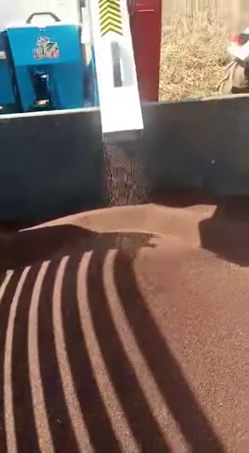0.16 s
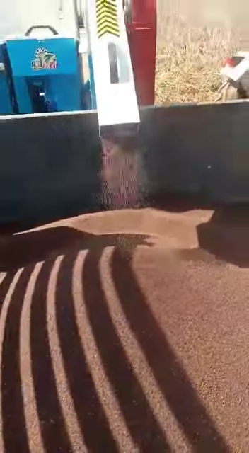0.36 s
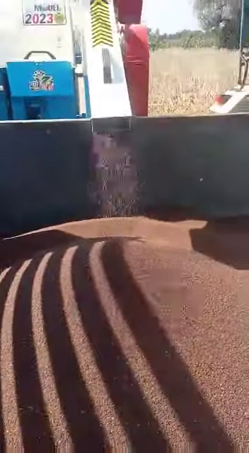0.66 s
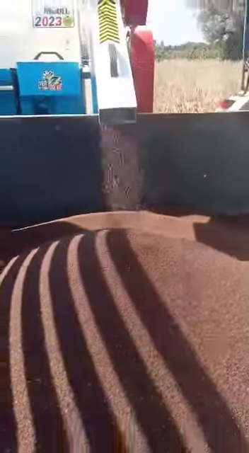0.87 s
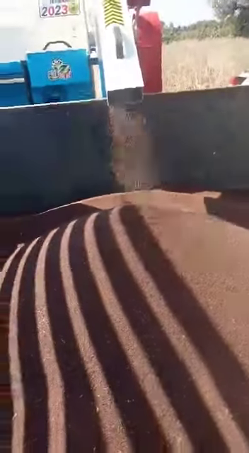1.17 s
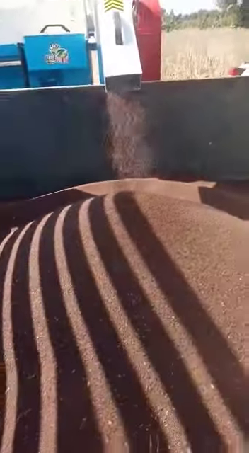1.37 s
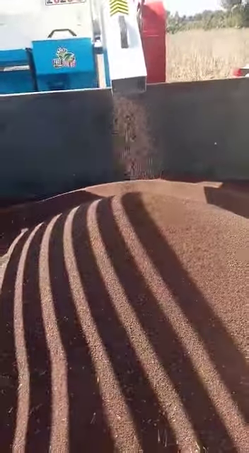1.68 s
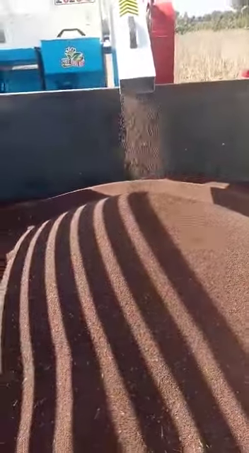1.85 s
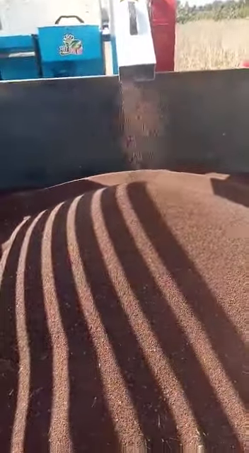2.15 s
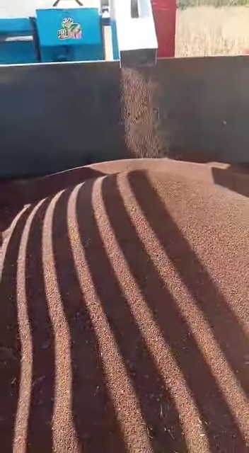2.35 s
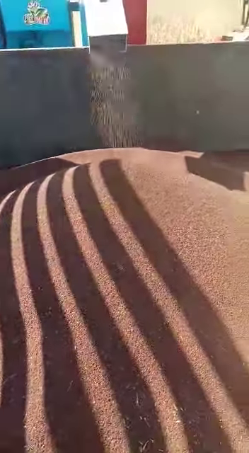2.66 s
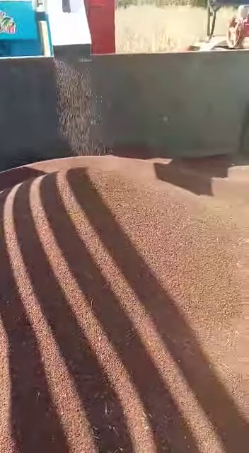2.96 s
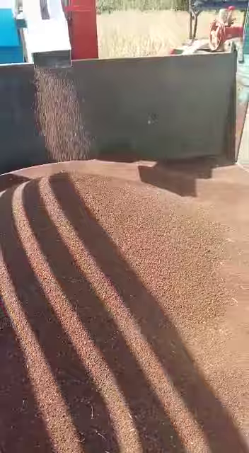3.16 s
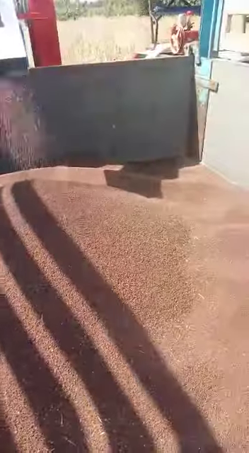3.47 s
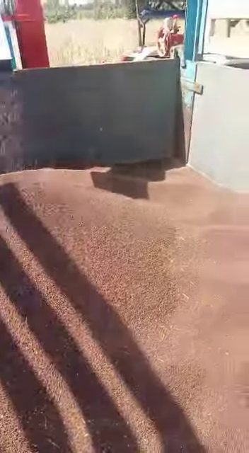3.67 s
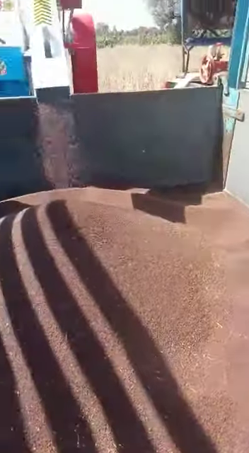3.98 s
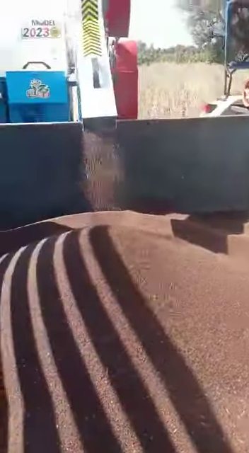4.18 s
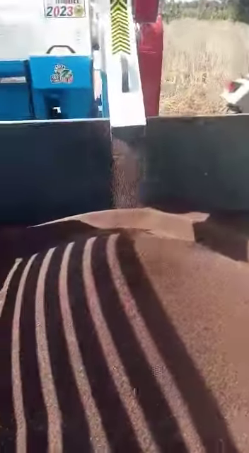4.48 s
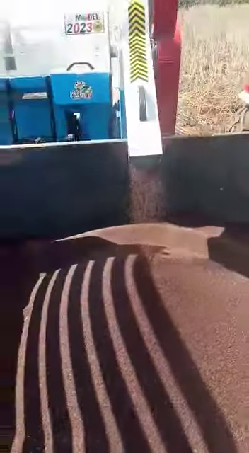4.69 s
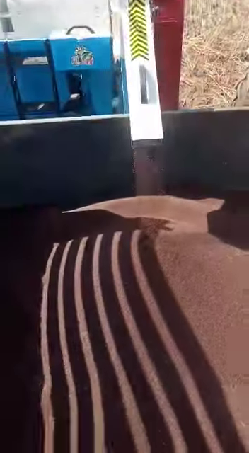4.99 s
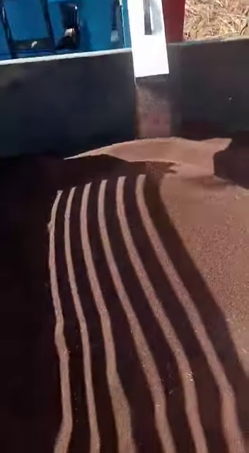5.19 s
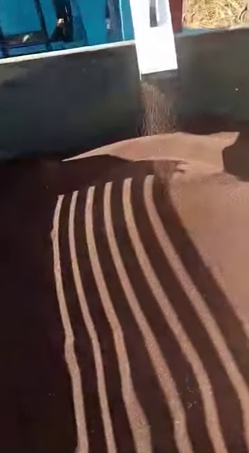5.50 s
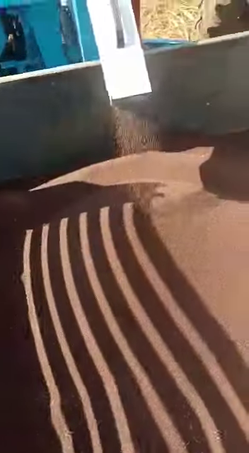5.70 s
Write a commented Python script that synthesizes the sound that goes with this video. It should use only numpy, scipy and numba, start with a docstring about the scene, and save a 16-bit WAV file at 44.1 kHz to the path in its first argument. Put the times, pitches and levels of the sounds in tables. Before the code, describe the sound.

A thresher runs hard, its drum booming in a throbbing low hum while grain hisses and patters into a steel trailer amid rattling knocks.

```python
"""In a field, inside the steel trailer into which a thresher pours grain; a phone is held there and slowly
turned. The beater drum booms and throbs as a moving sine with weak overtones; engine and shaft drone as
steadier sines. Fan, straw and hopper wall are shaped, flickering noise, and noise keeps the casing's modes
rattling. The shaker knocks the casing four times a turn and gusts grain down the chute: decaying sines, large
and tiny. Single knocks, handfuls of grain, dull thumps and one brief squeak stand out of the roar."""
import sys
import numpy as np
from scipy import signal
from scipy.fft import rfft, irfft, next_fast_len
from scipy.io import wavfile
from scipy.ndimage import uniform_filter1d
from numba import njit

SR = 44100
rng = np.random.default_rng(int(sys.argv[2]) if len(sys.argv) > 2 else 0)


def wav_out(sig):
    """Save sig, one row per channel (or a flat mono array), as 16-bit PCM at SR to the path in sys.argv[1]."""
    wavfile.write(sys.argv[1], SR, np.round(np.clip(np.atleast_2d(sig).T, -1, 1) * 32767).astype(np.int16))


def volts_from_decibels(level):
    """Turn decibel levels (scalar or array-like) into linear amplitude factors."""
    exponent = np.asarray(level, float) / 20
    return 10 ** exponent


N = 257544
T = np.arange(N) / SR
SHAKER_HZ = 5.712  # turns a second


def curves(rows):
    """Columns of a (time [s], ..) table at every sample."""
    s, *columns = np.transpose(rows)
    return [np.interp(T, s, column) for column in columns]


def unit(x):
    """Scaled to rms 1."""
    return x / np.sqrt(np.mean(x ** 2))


def colour(x, shape):
    """Filters x through (frequency [Hz], gain [dB]) points, straight over log frequency; rms 1."""
    hz, db = np.transpose(shape)
    size = next_fast_len(N)
    f = np.maximum(np.arange(size // 2 + 1) * SR / size, 1)
    gain = volts_from_decibels(np.interp(np.log(f), np.log(hz), db, -90, -90))
    return unit(irfft(rfft(x, size) * gain, size)[:N])


def walk(rate):
    """Random levels held 1 / rate s and slewed twice; rms 1."""
    hold = int(SR / rate)
    steps = np.repeat(rng.standard_normal(N // hold + 1), hold)
    return unit(uniform_filter1d(uniform_filter1d(steps, hold), hold)[:N])


def tone(hz, multiple=1):
    """A sine of rms 1 on a multiple of a moving pitch."""
    turns = multiple * np.cumsum(hz) / SR + rng.random()
    return np.sqrt(2) * np.sin(2 * np.pi * turns)


@njit
def rings(s, hz, t60, size):
    """Each row starts a sine that dies away 60 dB in t60."""
    out = np.zeros(N)
    for k in range(len(s)):
        z, p = size[k] + 0j, np.exp(2j * np.pi * hz[k] / SR - np.log(1000) / (t60[k] * SR))
        start = int(max(s[k], 0.) * SR)
        for i in range(start, min(N, start + int(t60[k] * SR))):
            z *= p
            out[i] += z.imag
    return out


def flickering(shape, flicker_db, rate):
    """Noise whose level flickers, shaped by (frequency [Hz], level per Hz [dB]) points; rms 1."""
    return colour(volts_from_decibels(flicker_db * walk(rate)) * rng.standard_normal(N), shape)


# beater bars passing, booming in the trailer where the phone is held:
# (time [s], crest level [dB], depth of the throb [dB])
DRUM = [(0, -11, 8), (.36, -12, 6.5), (.6, -12, 1.5), (.88, -11, 7), (1.05, -12, 11), (1.3, -13, 2),
        (1.54, -10.5, 4.5), (1.84, -9.5, 1.5), (2.05, -14.5, 9), (2.3, -14.5, 9), (2.55, -15.5, 9),
        (2.77, -9.5, 3.5), (3.3, -9.5, 0.5), (3.5, -6, 0), (3.8, -8, 3.5), (4, -9.5, 5), (4.35, -19, 0),
        (4.85, -20.5, 0), (5.15, -27.5, 4), (5.45, -25.5, 14), (5.84, -25.5, -2)]
# drum speed sags and recovers with the load: (time [s], bar-passing rate [Hz])
DRUM_HZ = [(0, 134), (.8, 133.9), (1.2, 135.1), (1.8, 135.7), (2.4, 136), (3, 135.5), (3.5, 135.1),
           (4, 134.1), (4.5, 135.1), (5.84, 135.3)]
# overtones of the drum: (time [s], 2nd level [dB], 3rd level [dB], 4th level [dB])
DRUM_OVERTONES = [(0, -39, -31.5, -35), (2, -42.5, -51, -49), (3.45, -33.5, -32.5, -34),
                  (4.35, -41, -43.5, -46), (4.75, -51, -30.5, -38), (5.1, -39, -38, -48),
                  (5.84, -39, -47, -54)]
# troughs of the uneven throb, four to six a second: (time [s])
THROB_S = [-.06, .14, .36, .54, .69, .99, 1.16, 1.37, 1.65, 1.84, 2, 2.17, 2.42, 2.66, 2.87, 3.04, 3.21,
           3.36, 3.59, 3.72, 3.89, 4.1, 4.36, 4.53, 4.72, 4.92, 5.17, 5.35, 5.55, 5.7, 5.9]


def drum():
    """The bar-passing tone booms in the trailer, throbs and flutters; weak overtones come and go."""
    hz = curves(DRUM_HZ)[0]
    overtones = 0
    for k, db in enumerate(curves(DRUM_OVERTONES)):
        wander_db = 5.3 * np.tanh(walk(18))
        overtones = overtones + volts_from_decibels(db + wander_db) * tone(hz + 0.31 * walk(10), k + 2)
    flutter = 1 + .05 * walk(60)
    crest_db, depth_db = curves(DRUM)
    # 1 in each trough, 0 midway between two
    throb = np.cos(np.pi * np.interp(T, THROB_S, np.arange(len(THROB_S)))) ** 4
    boom = volts_from_decibels(crest_db - depth_db * throb) * flutter * tone(hz + 0.7 * walk(20))
    half_rate = volts_from_decibels(-49.5) * tone(hz, .5)
    return boom + half_rate + overtones


# engine firing line: (time [s], level [dB])
ENGINE = [(0, -44), (2, -42), (4, -40), (4.3, -53), (5.25, -55), (5.35, -42), (5.84, -45)]
# orders of the engine: (multiple of the firing rate, level over the firing line [dB])
ENGINE_ORDERS = [(.75, -11), (1, -1.5), (2, 4), (2.249, -7), (2.5, 4), (4, 7.5), (5, 0.5), (6, 1)]


def engine():
    """Orders of the tractor's firing rate; uneven firing makes the higher ones waver and break up."""
    firing_hz = 47.19 + 0.401 * walk(8)
    orders = sum(volts_from_decibels(db + 0.5 * k * walk(6.2)) * tone(firing_hz, k) for k, db in ENGINE_ORDERS)
    return volts_from_decibels(curves(ENGINE)[0]) * orders


# lines of the drive shaft: (frequency [Hz], level [dB])
SHAFT = [(55.5, -47), (83.27, -41)]


def shaft():
    """Two lines of a drive shaft, steady in pitch and slightly wavering in level."""
    return sum(volts_from_decibels(db + 0.5 * walk(2.8)) * tone(np.full(N, hz)) for hz, db in SHAFT)


# low noise of the machine: (frequency [Hz], relative level per Hz [dB])
RUMBLE = [(88, -17.5), (150, -7.5), (167, -15.5), (194, -8.5), (306, -13.5), (340, -8.5), (436, -18.5),
          (544, -15.5), (600, -22), (780, -49), (1320, -120)]
# middle noise of the machine: (frequency [Hz], relative level per Hz [dB])
ROAR = [(320, -19), (550, -0.5), (617, -4.5), (680, 0.5), (924, -2), (1200, -6.5), (1560, -22),
        (2640, -120)]
# deepest bass: (frequency [Hz], relative level per Hz [dB])
DEEP = [(25, -30), (60, -14), (100, -5), (120, -5), (150, -10), (180, -10)]
# level of the deepest bass: (time [s], level [dB])
DEEP_LEVEL = [(0, -43), (.65, -31), (2.3, -34), (3, -28), (3.4, -34), (3.85, -31), (4.3, -36), (5.2, -54),
              (5.35, -36), (5.84, -36)]


def roar(rumble_db, roar_db):
    """Fan and straw: three bands of noise, each flickering on its own."""
    rumble = volts_from_decibels(rumble_db) * flickering(RUMBLE, 1.1, 14)
    middle = volts_from_decibels(roar_db) * flickering(ROAR, 1.0, 22)
    deep = volts_from_decibels(curves(DEEP_LEVEL)[0]) * flickering(DEEP, 3.2, 8.24)
    return rumble + middle + deep


# growl of the hopper wall: (time [s], level [dB])
GROWL = [(0, -25.5), (.35, -33.5), (2, -38.5), (4.4, -36.5), (5.25, -28.5), (5.42, -21.5), (5.84, -20.5)]
# its spectrum: (frequency [Hz], relative level per Hz [dB])
GROWL_SHAPE = [(200, -30), (260, -5), (334, 0.5), (430, -5), (520, -21)]


def growl():
    """The hopper wall growls under the sliding crop: noise around its low ring."""
    return volts_from_decibels(curves(GROWL)[0]) * flickering(GROWL_SHAPE, 1.5, 18)


def lumps():
    """The crop comes in lumps that shake all the treble at once; in dB."""
    return 1.17 * walk(28)


def surge(share, db, both_share, both_db):
    """Level change in dB through each shaker turn; the strong stroke slowly changes sides."""
    turn = T * SHAKER_HZ
    even_s, side_change_s = 2.07, 3.56  # a moment of equal strokes; time between two such moments
    side = np.sin(np.pi * (even_s - T) / side_change_s)
    one_stroke = db * side * np.cos(2 * np.pi * (turn - share))
    both_strokes = both_db * np.cos(2 * np.pi * 2 * (turn - both_share))
    return one_stroke + both_strokes


def follow(treble_db, share):
    """A level that takes only a share of the treble's changes around -31 dB."""
    usual_db = -31
    return usual_db + share * (treble_db - usual_db)


# high noise: (frequency [Hz], relative level per Hz [dB])
HISS = [(1500, -24), (2300, -0.5), (3000, -0.5), (3700, -1), (4300, -14.5), (5100, -20.5), (7300, -4),
        (8900, -14), (11500, -19), (15000, -16), (16000, -20)]
# its surge: (crest [share of a turn], largest swing [dB], crest on both strokes [share of a turn], swing [dB])
HISS_SURGE = (0.3, 1.6, 0.38, .4)


def hiss(treble_db, lumps_db):
    """The high noise of fan and straw, surging with the shaker."""
    return volts_from_decibels(treble_db - 3 + lumps_db + surge(*HISS_SURGE)) * flickering(HISS, 1.0, 20)


# modes of the sheet-steel casing: (frequency [Hz], ring time t60 when struck [s], relative level [dB])
CASING = [(530, 0.19, -6), (697, .1, -5), (852, .11, -1), (929.6, 0.088, 1.5), (1021, 0.12, -1),
          (1370, 0.12, -1), (1560, 0.043, 0), (1708, 0.091, -1.5), (2086, 0.071, -3), (2270, 0.077, -6.5),
          (2540, 0.086, 0.5), (2814, 0.049, -2), (3137, 0.037, 0), (3650, 0.048, -5)]


def rattle():
    """Straw and kernels keep the casing's modes buzzing, now this one, now that; rms 1."""
    out = 0
    for hz, t60, db in CASING:
        r = np.exp(-np.log(1000) / (0.68 * t60 * SR))  # the load damps the steel
        poles = [1, -2 * r * np.cos(2 * np.pi * hz / SR), r * r]
        ring = signal.lfilter([1, 0, -1], poles, rng.standard_normal(N))
        out = out + volts_from_decibels(db + 9.5 * np.tanh(walk(22))) * unit(ring)
    return unit(out)


# rustling straw: (frequency [Hz], relative level per Hz [dB])
RUSTLE = [(680, -50), (1150, -4), (1380, 2.5), (1690, 2.5), (1880, 1.5), (2510, -4), (3700, -14.5),
          (4370, -23), (5000, -37), (6500, -48), (11000, -120)]
# its surge: (crest [share of a turn], largest swing [dB], crest on both strokes [share of a turn], swing [dB])
STRAW_SURGE = (0.29, 2.57, 0.29, 0.62)


def straw(treble_db, lumps_db):
    """Straw rustles as flickering noise and rattles the casing, surging with the shaker."""
    level_db = follow(treble_db, 0.54) + surge(*STRAW_SURGE) + lumps_db
    return volts_from_decibels(level_db) * (volts_from_decibels(-2.5) * flickering(RUSTLE, 2.0, 25.28) + volts_from_decibels(-1) * rattle())


# colour of all the grain: (frequency [Hz], gain [dB])
GRAIN = [(2650, -16), (4500, -14), (5000, -21.5), (5360, -20), (7140, 1), (8070, -3), (9260, -15.5),
         (11900, -14.5), (14900, -16.5), (15500, -3), (16000, -20)]
# its surge: (crest [share of a turn], largest swing [dB], crest on both strokes [share of a turn], swing [dB])
GRAIN_SURGE = (0.34, 2.17, 0.38, 0.88)
# handfuls that hit the steel at once: (time [s], nominal level before colouring [dB], shared pitch [Hz])
SPLASHES = [(0.046, -12.5, 14900), (.59, -21, 11300), (0.6984, -17, 9400), (.7622, -23, 8900),
            (1.079, -22.5, 9900), (1.786, -20, 8800), (2.252, -18, 12600), (2.663, -24, 10400),
            (2.9163, -19, 11200), (3.463, -16.5, 10500), (4.5307, -16, 9860), (4.883, -18.5, 10100),
            (5.171, -21, 9420), (5.4276, -23, 9460), (5.463, -17, 9000)]


def hail(flow_db):
    """A dense hail of kernels on steel, each a tiny ringing tick, as loud as the flow."""
    gain = volts_from_decibels(flow_db + 1.33 * walk(30))
    when, hardness, pitch, length = rng.random((40000, 4)).T
    sample = (when * N).astype(int)
    size = gain[sample] * volts_from_decibels(-1.8 * np.log(1 - hardness))
    # kernels come in clumps that ring alike: 32 pitch bands swell and fade separately
    clumps_db = 2.75 * np.array([walk(30) for _ in range(32)])
    size = size * volts_from_decibels(clumps_db[(32 * pitch).astype(int), sample])
    size = size * volts_from_decibels(-7 * (pitch > .45))  # ticks above 9400 Hz are softer
    ticks = rings(when * N / SR, 4000 + 12000 * pitch, 0.027 + 0.059 * length ** 2, size)
    return ticks * np.sqrt(np.mean(gain ** 2) / np.mean(ticks ** 2))


def handfuls():
    """Handfuls of forty kernels strike almost together, each a short ringing tick."""
    s, db, shared_hz = np.transpose(SPLASHES)[:, :, None]
    delay, group, pitch, hardness = rng.random((4, len(s), 40))
    late_s = -.008 * np.log(1 - delay)
    # about a third of each handful shares nearly one pitch
    hz = np.where(group < .3, shared_hz * (.97 + 0.038 * pitch), 5500 + 10500 * pitch)
    size = volts_from_decibels(db - 14 + 2.7 * hardness)  # -14 dB: one kernel's part of the handful
    return rings((s + late_s).ravel(), hz.ravel(), np.full(hz.size, .02), size.ravel())


def grain(treble_db, lumps_db):
    """Grain on steel: hail in shaker gusts plus handfuls, coloured together at an unchanged rms."""
    flow_db = follow(treble_db, 0.65) - 5 + surge(*GRAIN_SURGE) + lumps_db
    ticks = hail(flow_db) + handfuls()
    return colour(ticks, GRAIN) * np.sqrt(np.mean(ticks ** 2))


# single knocks, each at its own time and spot: (time [s], nominal level [dB], part of the casing struck [Hz])
KNOCKS = [(0.0298, -19, 1400), (0.6976, -11.5, 1250), (.742, -16, 1370), (0.8707, -14.5, 1370),
          (1.0844, -10, 2090), (1.2603, -12, 1370), (1.311, -16, 1340), (1.4115, -15.5, 1370),
          (1.438, -12, 1560), (1.641, -14, 930), (1.708, -9.5, 1530), (1.758, -12, 1370),
          (2.029, -15.5, 1440), (2.059, -16, 1030), (2.219, -11, 1390), (2.259, -13.5, 1590),
          (2.394, -13, 1290), (2.5805, -21, 1500), (2.7526, -9.5, 1720), (2.9292, -9.5, 1730),
          (3.0606, -10, 1780), (3.0944, -21, 930), (3.467, -19, 1560), (3.62, -12, 2720),
          (3.8043, -15, 1720), (3.938, -18, 1740), (4.2872, -19, 2280), (4.5096, -17, 1340),
          (4.845, -12, 3660), (5.3594, -16, 2700), (5.4705, -13, 2540), (5.6401, -14, 1340),
          (5.8105, -11, 1370)]
# light knocks of one shaker turn: (time [share of the turn], nominal level [dB])
SHAKER_KNOCKS = [(.22, -17.5), (.5, -16.5), (.72, -18), (.95, -17.5)]


def shaker_knocks():
    """Rows of light knocks on every shaker turn, a little uneven in time, level and spot."""
    turns = np.arange(int(N / SR * SHAKER_HZ) + 1)[:, None]
    share, db = np.transpose(SHAKER_KNOCKS)
    s = ((turns + share) / SHAKER_HZ).ravel()
    late, harder, aside = rng.standard_normal((3, len(s)))
    level_db = np.tile(db, len(turns)) + 1.5 * harder
    return np.c_[s + .004 * late, level_db, 1400 * 2 ** (.55 * aside)]


def casing():
    """Knocks ring the sheet steel, most near the spot struck; each is a rattle of three blows."""
    s, peak_db, spot_hz = np.r_[np.array(KNOCKS), shaker_knocks()].T[:, :, None, None]
    hz, t60, db = np.transpose(CASING)[:, None, :, None]
    harder, late, off_pitch = rng.standard_normal((3, len(s), len(CASING), 3))
    blow = np.arange(3)
    near_db = np.maximum(-40 * abs(np.log2(hz / spot_hz)), -11)  # far modes fall no lower
    blow_db = -4.3 * abs(blow - 1) + 1.3 * harder  # the middle blow tends to be hardest
    size = volts_from_decibels(peak_db + db + near_db - 7.5 + blow_db)  # -7.5 dB: one mode's part of the peak
    s = s + .009 * blow + .004 * abs(late)
    hz = hz * (1 + 0.017 * off_pitch[:, :, :1])
    return rings(*(a.ravel().copy() for a in np.broadcast_arrays(s, hz, t60, size)))


# dull thumps of the hopper wall: (time [s], nominal level before smoothing [dB])
THUMPS = [(.064, -13.5), (.451, -17.5), (1.614, -19), (2.381, -19.5), (3.056, -18), (3.374, -11),
          (4.676, -22), (5.512, -9.5), (5.631, -14), (5.733, -10)]


def thumps():
    """Soft pushes set off the hopper wall's low ring near 334 Hz, smoothed at its start."""
    s, db = np.transpose(THUMPS)
    hz = 334 * (1 + 0.015 * rng.standard_normal(len(s)))
    return uniform_filter1d(rings(s, hz, np.full(len(s), .22), volts_from_decibels(db)), size=33)


# one brief metal squeak: (time [s], length [s], frequency [Hz], level [dB])
SQUEAK = (2.268, .018, 4090, -35)


def squeak():
    """A short scrape holds one slightly trembling pitch."""
    s, length, hz, db = SQUEAK
    return volts_from_decibels(db) * np.exp(-((T - s) / length) ** 2) * tone(hz + 15 * walk(72))


# noise of the machine at the phone as it turns:
# (time [s], rumble level [dB], roar level [dB], treble reference level [dB])
HEARD = [(0, -18, -21, -26), (.1, -25, -26, -28), (.7, -24.5, -28.5, -30.5), (1.3, -25, -33.5, -32),
         (1.55, -23, -29.5, -31), (1.76, -26, -26.5, -28.5), (1.9, -23.5, -29, -30.5),
         (2.3, -30.5, -31, -31.5), (2.95, -23, -30, -30.5), (3.35, -26.5, -31.5, -32.5),
         (3.45, -24.5, -25, -31), (3.85, -26, -31, -34.5), (4.3, -28.5, -32.5, -33),
         (5.25, -26, -27.5, -32), (5.43, -22.5, -21.5, -22), (5.58, -22, -24.5, -25.5),
         (5.68, -20, -19.5, -20), (5.74, -23.5, -24.5, -24.5), (5.84, -16.5, -21.5, -22)]


def scene():
    """All sources at one microphone in the trailer."""
    rumble_db, roar_db, treble_db = curves(HEARD)
    lumps_db = lumps()
    machine = drum() + engine() + shaft()
    noise = roar(rumble_db, roar_db) + growl() + hiss(treble_db, lumps_db)
    crop = straw(treble_db, lumps_db) + grain(treble_db, lumps_db)
    return (machine + noise + crop + casing() + thumps() + squeak())[None]


def band_limit(x):
    """A steep low-pass at the top of the band."""
    return signal.sosfilt(signal.butter(12, 16560, fs=SR, output="sos"), x)


def record(dry):
    """The phone rounds the loudest peaks and cuts the top above 15520 Hz."""
    round_tops = np.tanh(0.6 * dry) / 0.6
    low_pass = signal.ellip(10, .2, 80, 15520, fs=SR, output="sos")
    mix = signal.sosfilt(low_pass, round_tops)
    return band_limit(mix)


dry = scene()
out = record(dry)
wav_out(out)
```